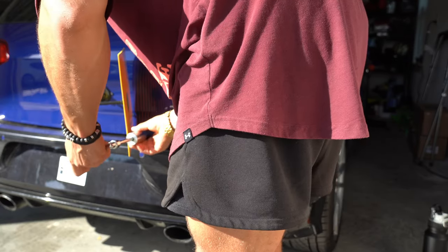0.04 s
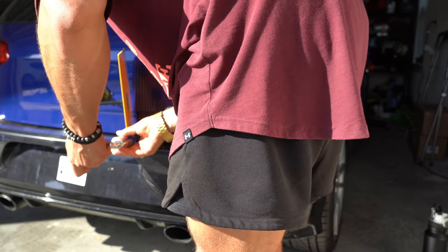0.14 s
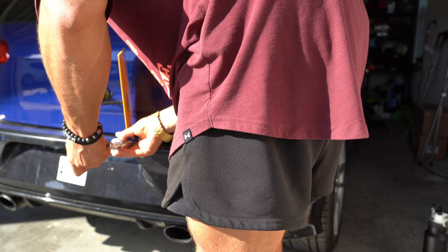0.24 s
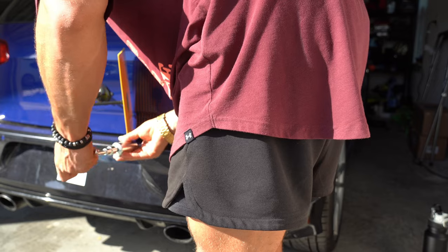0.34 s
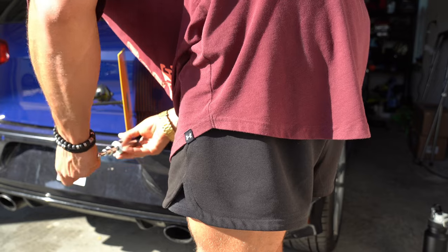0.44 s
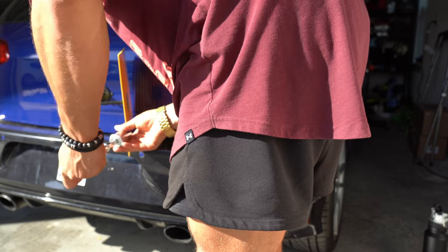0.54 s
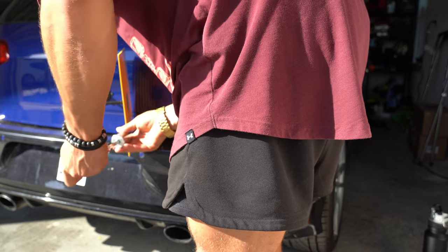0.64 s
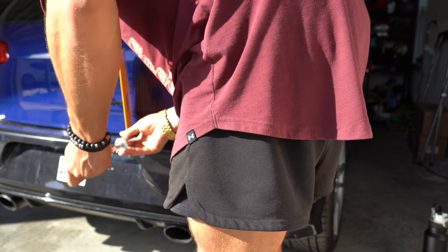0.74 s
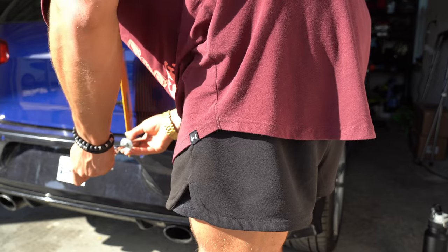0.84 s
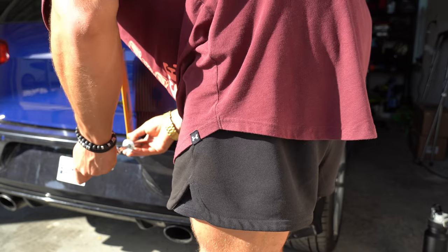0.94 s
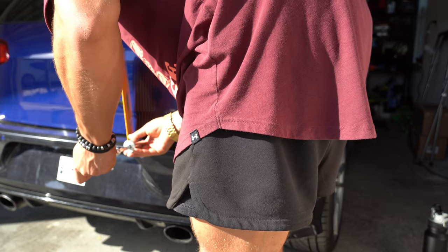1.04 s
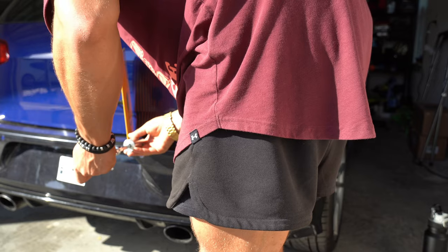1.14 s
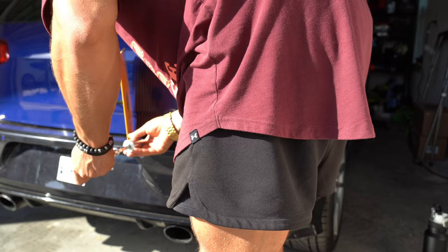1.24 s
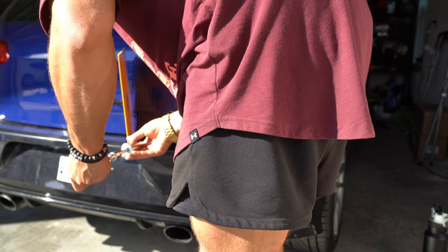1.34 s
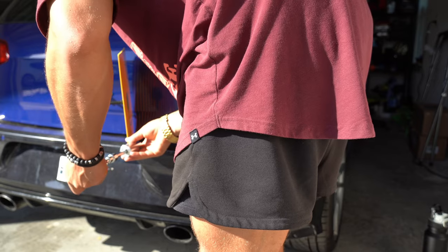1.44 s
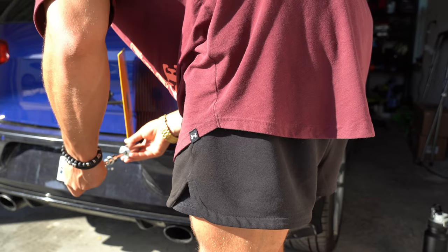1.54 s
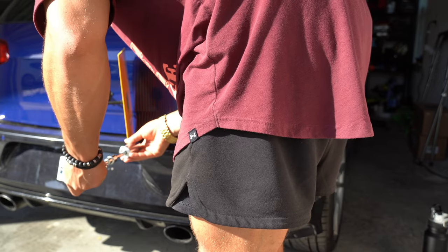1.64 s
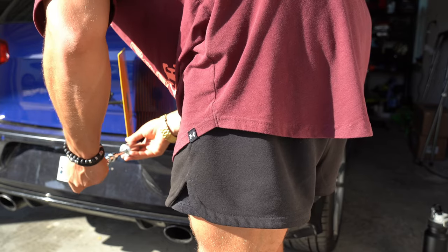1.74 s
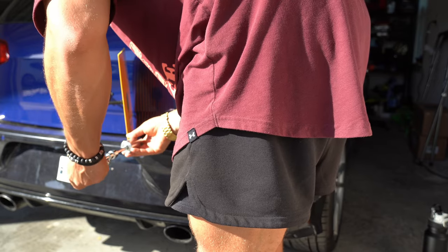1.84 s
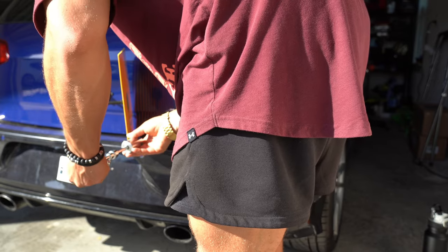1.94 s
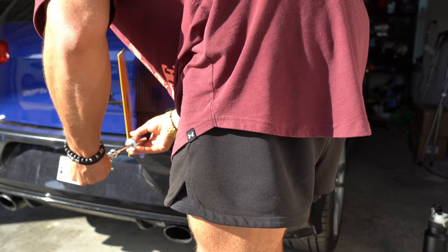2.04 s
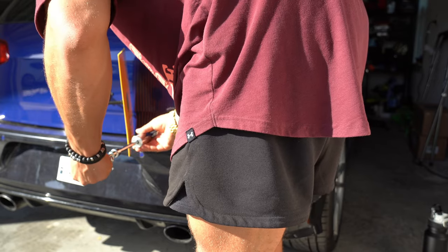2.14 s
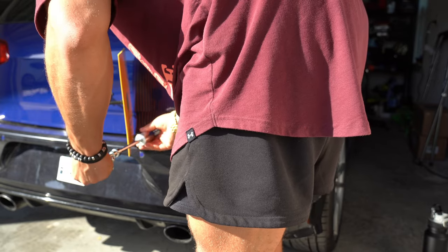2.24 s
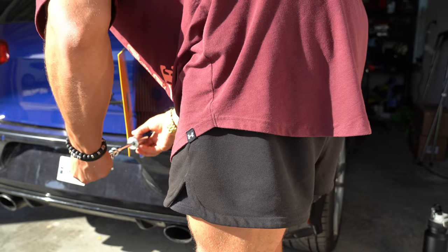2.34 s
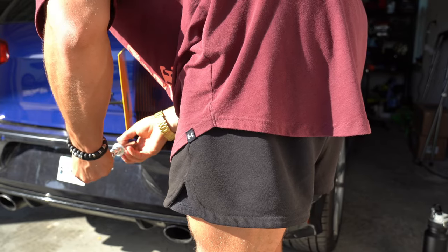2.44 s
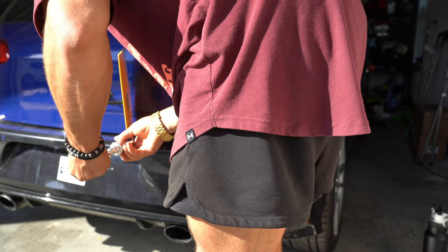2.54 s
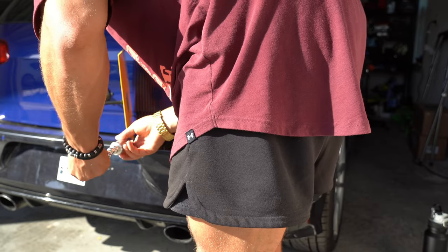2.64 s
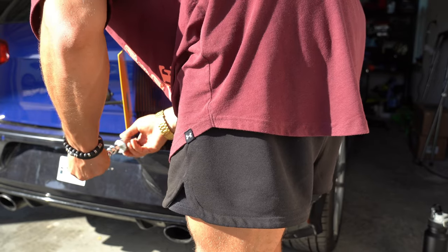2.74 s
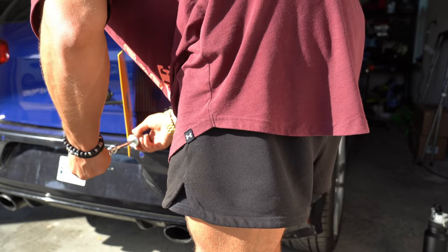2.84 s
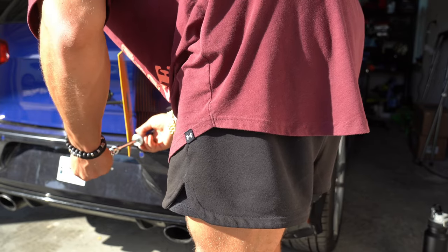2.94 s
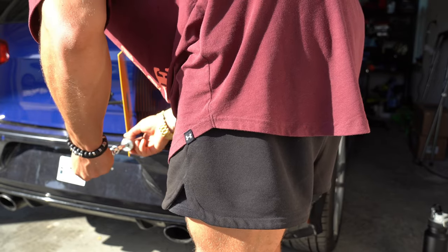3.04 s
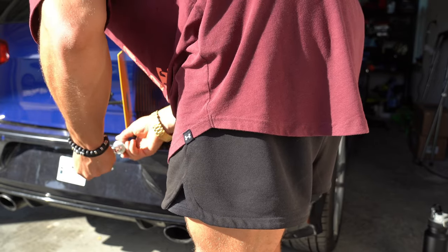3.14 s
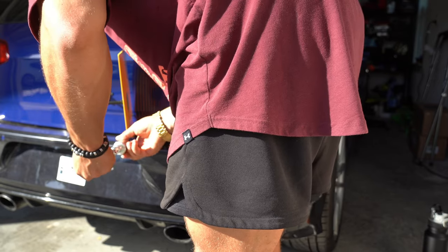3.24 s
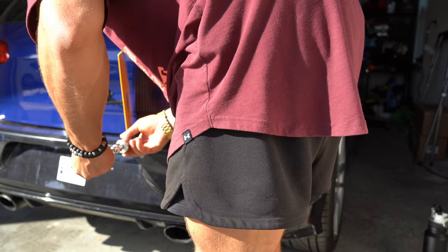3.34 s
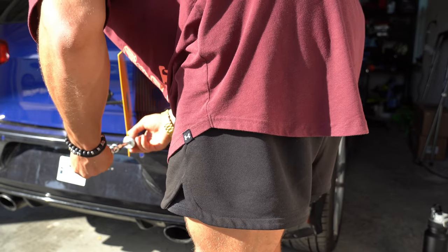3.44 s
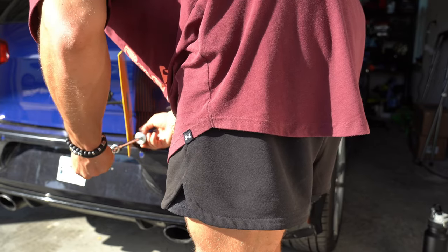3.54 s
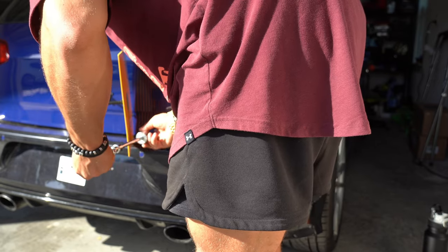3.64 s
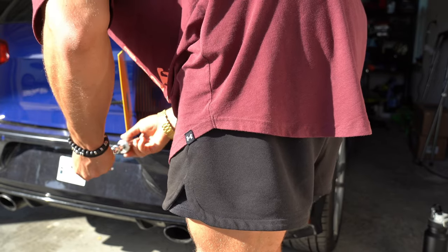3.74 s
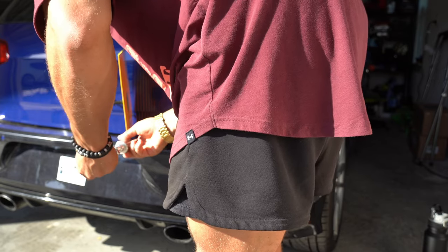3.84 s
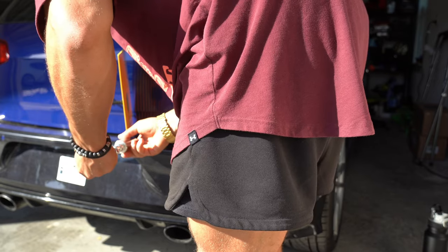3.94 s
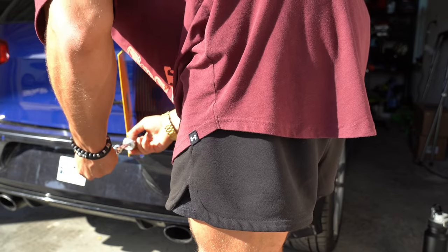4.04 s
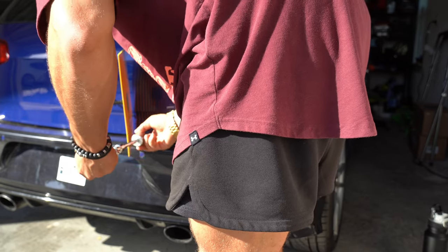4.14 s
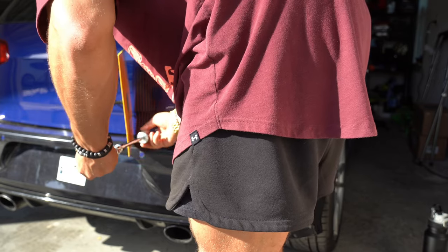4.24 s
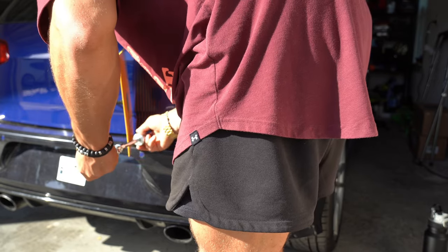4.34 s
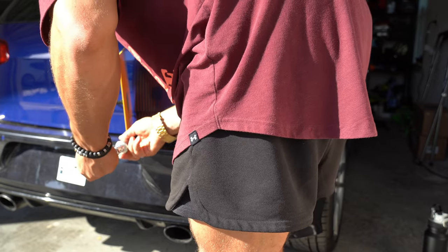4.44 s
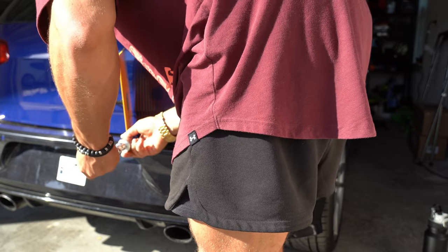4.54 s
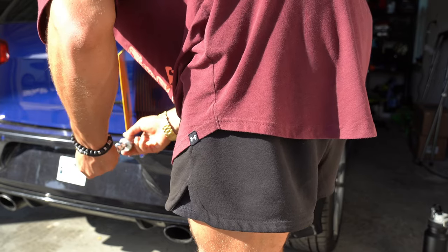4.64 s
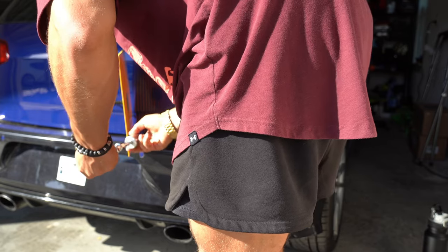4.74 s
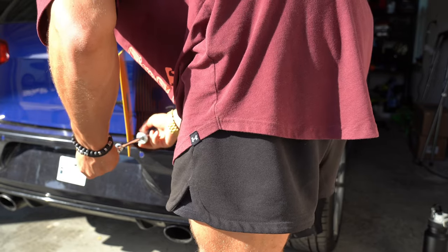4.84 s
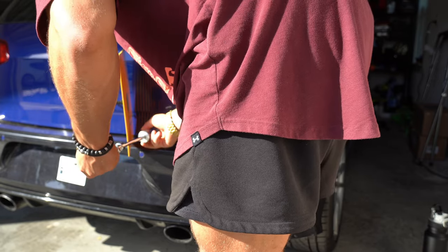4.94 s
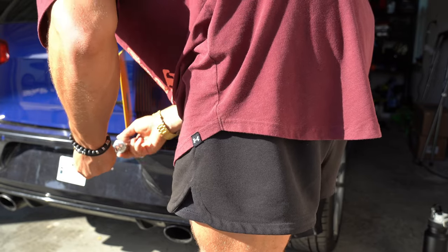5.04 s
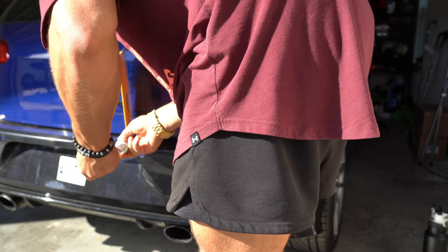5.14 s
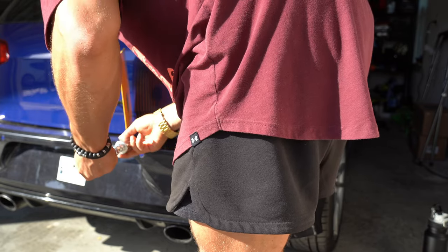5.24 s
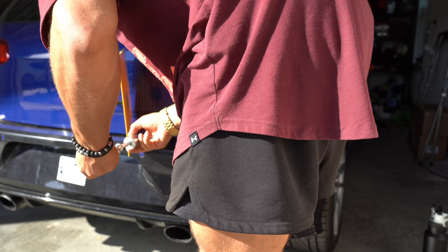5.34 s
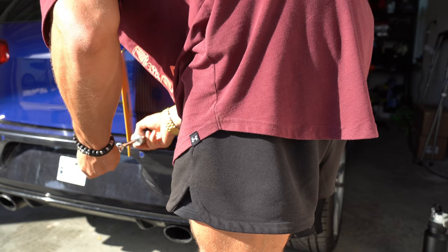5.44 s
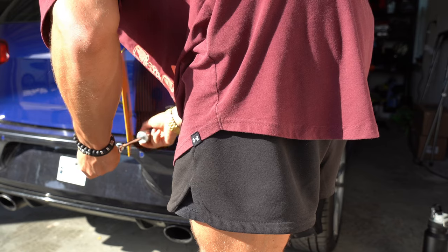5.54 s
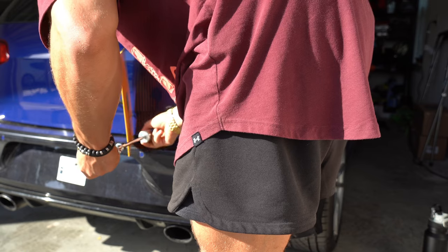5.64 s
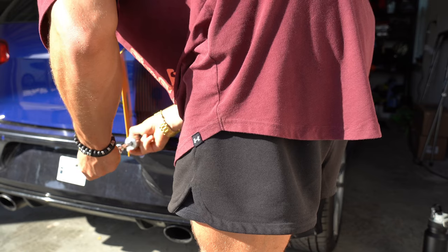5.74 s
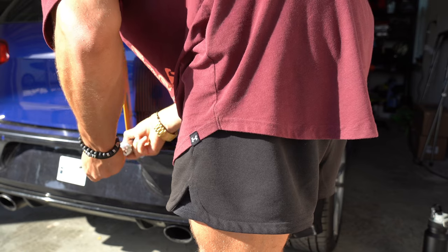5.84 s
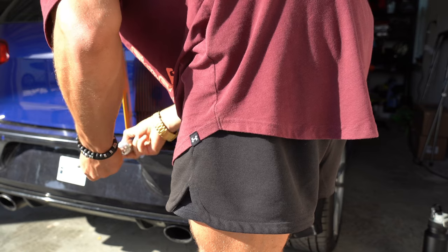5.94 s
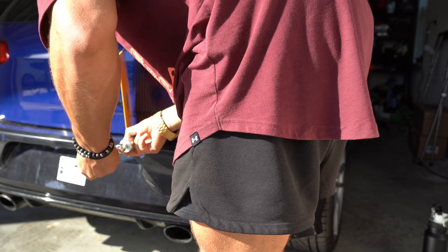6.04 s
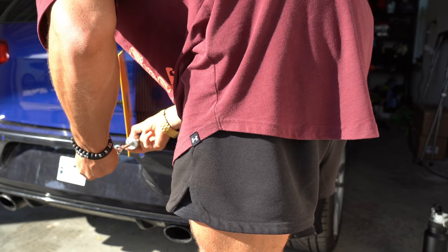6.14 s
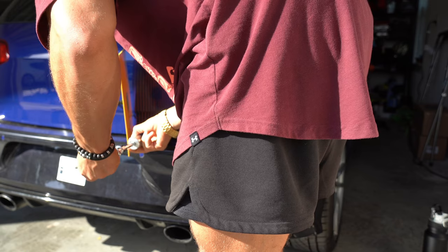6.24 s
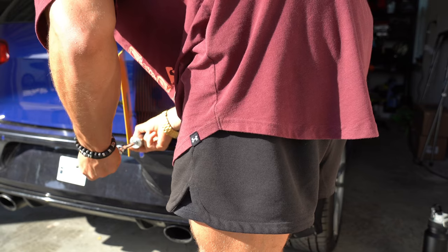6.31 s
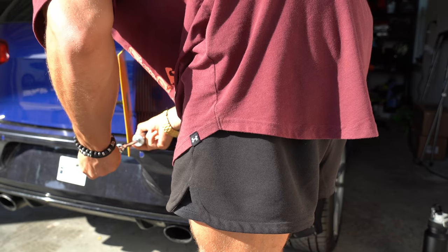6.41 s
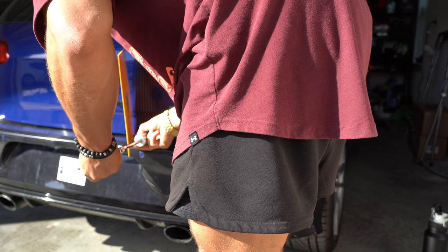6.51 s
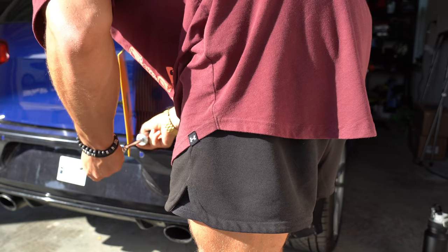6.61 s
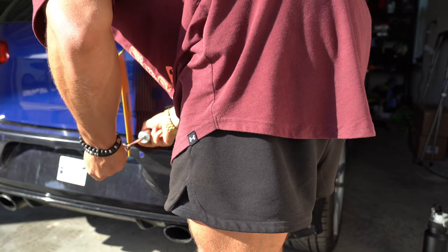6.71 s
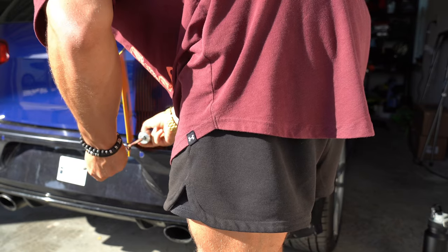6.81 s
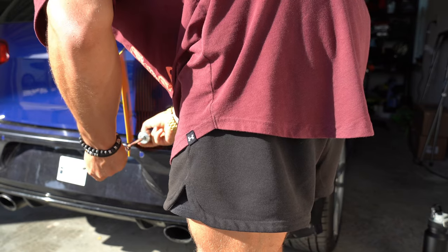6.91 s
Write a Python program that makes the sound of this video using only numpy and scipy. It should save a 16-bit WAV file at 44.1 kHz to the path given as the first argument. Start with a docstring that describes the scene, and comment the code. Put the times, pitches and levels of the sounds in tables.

```python
"""At the mouth of a garage, a hand slide hammer pulls a dent out of a car's rear panel.
Seven times a steel weight scrapes up its rod and cracks against the stop. Each blow jerks
a tab glued to the sheet metal, which booms. Between blows the weight slides back and the
loose tool clinks. The garage echoes every knock over a low background rumble."""
import sys
import numpy as np
from scipy import signal
from scipy.fft import rfft, irfft
from scipy.io import wavfile

SR = 44100
rng = np.random.default_rng(int(sys.argv[2]) if len(sys.argv) > 2 else 0)


def transcribe(u):
    """Save the signal u as a 16-bit wav file named by the first command-line argument.

    u: samples, shape (n,) or (channels, n), limited to [-1, 1]; the rate is SR.
    q: integer samples, one column per channel.
    """
    v = np.clip(np.atleast_2d(u).T, -1, 1)
    q = np.round(v * 32767).astype(np.int16)
    wavfile.write(sys.argv[1], SR, q)


N = 307377
TIME = np.arange(N) / SR


def from_db(db):
    """Turn decibels into a number to multiply a sound by."""
    return 10 ** (np.asarray(db) / 20)


def at_hz(table, hz, column=1):
    """Look up a pitch in a table, blending between its rows."""
    table = np.array(table)
    return np.interp(np.log(np.maximum(hz, 1)), np.log(table[:, 0]), table[:, column])


def coloured(noise, spectrum):
    """Give a noise its balance of low and high pitches, at a standard strength of 1."""
    hz = np.fft.rfftfreq(len(noise), 1 / SR)
    out = irfft(rfft(noise) * from_db(at_hz(spectrum, hz)), len(noise))
    return out / np.std(out)


def wander(per_s):
    """A curve that drifts from one random value to the next."""
    return np.interp(TIME * per_s, np.arange(N), rng.standard_normal(N))


def struck(tones, times, db, tilt_db=0, scatter_db=2, detune=0.01):
    """Each hit rings all of an object's tones; the grip shifts their strength and pitch a little."""
    hz, tone_db, fade_s = np.transpose(tones)[:, :, None]   # a fade time is the time to drop 60 dB
    t = TIME[:int(SR * min(fade_s.max(), 0.5))]
    out = np.zeros(N + SR)
    octaves = np.log2(hz / np.median(hz))
    direction = (-1) ** np.arange(len(hz))[:, None]   # neighbouring tones swing opposite ways
    for s, level_db, slope_db in np.broadcast(times, db, tilt_db):
        strength, shift = rng.standard_normal((2, len(hz), 1))
        start_db = level_db + tone_db + slope_db * octaves + scatter_db * strength
        waves = direction * np.sin(2 * np.pi * hz * (1 + detune * shift) * t)
        start = round(s * SR)
        out[start:start + len(t)] += np.sum(from_db(start_db - 60 * t / fade_s) * waves, axis=0)
    return out[:N]


def chatter(spectrum, times, db, fade_s, grain_db):
    """A crowd of tiny, uneven contacts dies away after each knock."""
    grains = rng.standard_normal(N) * from_db(grain_db * rng.standard_normal(N))
    knocks = np.zeros(N)
    knocks[np.round(times * SR).astype(int)] = from_db(db)
    dying = signal.lfilter([1], [1, -from_db(-60 / (fade_s * SR))], knocks + 1e-18)
    return dying * coloured(grains, spectrum)


# the tone of the background noise: (pitch [Hz], level [dB])
RUMBLE_SPECTRUM = [(15, -42.5), (25, -10.5), (48, -13), (80, -3.5), (117, -6), (236, -1), (394, -2.5),
                   (624, -8), (695, -8), (754, -6), (1520, -17), (4030, -26), (4870, -32), (7310, -40),
                   (16000, -59.5)]
def rumble(level_db=-51):
    """A low, steady noise lies under everything."""
    return from_db(level_db) * coloured(rng.standard_normal(N), RUMBLE_SPECTRUM)


# the weight is pushed back down the rod: (time at mid-stroke [s], rubbing level [dB])
RETURN_STROKES = [(2.18, -56.5), (2.83, -53.5), (3.52, -54.5), (4.18, -51.5), (4.84, -53.5), (5.51, -56),
                  (6.14, -60)]
def strokes(pull_s=0.14, pull_db=-47.5, return_s=0.32):
    """How hard the weight rubs: more as it speeds up to a blow, then a soft swell on the way back."""
    pulls = returns = 0
    for s, *_ in BLOWS:
        speed = np.clip(1 - (s - TIME) / pull_s, 0, 1) * (TIME < s)
        pulls += from_db(pull_db) * speed ** 1.2
    for s, db in RETURN_STROKES:
        progress = np.clip((TIME - s) / return_s, -0.5, 0.5)
        returns += from_db(db) * np.cos(np.pi * progress) ** 2
    return pulls + returns


# tones that rubbing wakes in the rod: (pitch [Hz], width [Hz], level [dB])
RASP_TONES = [(871, 80, 7), (1490, 190, 4), (2348, 220, 2.5), (2780, 400, 0.5), (3640, 240, 2),
              (4400, 250, -4.5), (5260, 310, -4.5), (6370, 450, -11), (7150, 320, -10.5), (9750, 1500, -21)]
def slides(grain_db=3, catch_db=3.5, flutter_db=4.5, dull_hz=7800, body_db=-3.5):
    """Steel rubs on steel: the weight catches and slips, waking now one tone of the rod, now another."""
    friction = rng.standard_normal(N)
    friction *= from_db(grain_db * rng.standard_normal(N) + catch_db * wander(per_s=79))
    rasp = 0
    for k, (hz, width_hz, db) in enumerate(RASP_TONES):
        b, a = signal.iirpeak(hz, hz / width_hz, fs=SR)
        push = friction * from_db(db + flutter_db * wander(per_s=25))
        rasp += (-1) ** k * signal.lfilter(b, a, push)
    rasp = signal.sosfilt(signal.butter(2, dull_hz, fs=SR, output="sos"), rasp)
    body = from_db(body_db) * coloured(friction, BODY_SPECTRUM)   # carried through the tab into the car
    return strokes() * (rasp / np.std(rasp) + body)


# the weight hits the stop:
# (time [s], panel level [dB], steel level [dB], steel brightness [dB per octave])
BLOWS = [(0.1794, -4.5, -4, 5), (2.4711, -3, -9, -5.5), (3.1474, 0, 0.5, 2.5), (3.7984, 0, 1, -6.5),
         (4.4690, 0, 2.5, 0), (5.1209, -0.5, -0.5, -4.5), (5.8117, -3, 0, -7.5)]
# weight and stop, muffled by the hand: (pitch [Hz], level [dB], fade time [s])
STEEL_TONES = [(2050, -24.5, 0.008), (2450, -12.5, 0.0094), (2770, -14, 0.017), (3100, -10.5, 0.008),
               (3650, -9, 0.011), (3990, -8, .011), (4870, -11.5, 0.007), (5420, -14, 0.009),
               (6640, -16.5, .008), (7360, -24, 0.009), (11280, -29.5, 0.0042), (12900, -32.5, 0.005)]
# the rod ringing freely: (pitch [Hz], level [dB], fade time [s])
ROD_TONES = [(3600, -13.5, .1), (5700, -21.5, 0.11), (7300, -18, 0.16), (7530, -16, .06), (9760, -24, 0.08),
             (12150, -26.5, .05), (14500, -30, .04)]
# metal parts buzzing after a blow: (pitch [Hz], level [dB])
BUZZ_SPECTRUM = [(700, -4.5), (1300, 4), (1800, 3.5), (3800, 5), (4500, -1), (6800, 1), (8500, -8.5),
                 (12000, -14.5), (16000, -23.5)]
def cracks():
    """Steel hits steel: a burst of tiny contacts, a ring the hand chokes at once, a faint rod ping."""
    times, _, steel_db, tilt_db = np.transpose(BLOWS)
    ring = struck(STEEL_TONES, times, steel_db + 0.6, tilt_db, scatter_db=3.15, detune=0.0029)
    ping = struck(ROD_TONES, times, steel_db - 26, scatter_db=1.5, detune=0.0018)
    burst = chatter(BUZZ_SPECTRUM, times, steel_db - 10, fade_s=0.014, grain_db=0.5)
    return ring + ping + burst


# the sheet metal and the car body behind it: (pitch [Hz], level [dB], fade time [s])
PANEL_TONES = [(64.6, -47.5, 0.41), (80, -45, 0.21), (118, -52.5, 0.49), (155, -45, 0.86),
               (182.3, -39, 0.6), (211.1, -32, 0.37), (248.9, -17, 0.27), (260.5, -16, 0.14),
               (313.5, -9, 0.12), (383, -28, 0.38), (394.4, -22.5, 0.19), (429, -13, 0.091),
               (454, -22.5, 0.072), (518, -15, 0.21), (575, -24, 0.16), (560.2, -20.5, 0.26),
               (635, -26, 0.33), (682.7, -14.5, 0.12), (700.7, -13.5, 0.12), (802, -27, 0.17),
               (896.7, -23, 0.15), (993, -30, 0.046), (1148, -35.5, 0.17), (1148, -24, 0.26),
               (1287, -35, 0.1), (1350, -31.5, 0.089), (1486, -25.5, 0.072)]
# the car body's many small tones, blurred into noise: (pitch [Hz], level [dB])
BODY_SPECTRUM = [(40, -31.5), (150, -20), (240, -5.5), (370, -1), (480, -2.5), (720, -7), (950, -11),
                 (1500, -18.5), (2500, -24.5), (8000, -60.5)]
def booms(tab_lag_s=0.00057, heave_hz=330, heave_db=-8, heave_fade_s=0.0077, heave_cut_hz=190):
    """The springy tab tugs the panel: the sheet heaves out once, then rings while loose parts buzz."""
    times, panel_db, _, _ = np.transpose(BLOWS)
    pulled = times + tab_lag_s
    heave = struck([(heave_hz, heave_db, heave_fade_s)], pulled, panel_db)
    # the heave carries no deep bass
    heave = signal.sosfilt(signal.butter(2, heave_cut_hz, "high", fs=SR, output="sos"), heave)
    ring = struck(PANEL_TONES, pulled, panel_db - 0.4, scatter_db=2, detune=0.007)
    shudder = chatter(BODY_SPECTRUM, pulled, panel_db - 14.5, fade_s=0.27, grain_db=2.5)
    buzz = chatter(BUZZ_SPECTRUM, times, panel_db - 18, fade_s=0.1, grain_db=4.5)
    return heave + ring + shudder + buzz


# light touches of weight, rod and tab: (time [s], clink level [dB], panel level [dB])
TAPS = [(0.6199, -40.5, -47), (0.879, -56.5, -56), (1.1652, -55.5, -58), (1.2033, -54, -43),
        (1.8601, -44.5, -40), (1.9003, -38, -29.5), (2.02, -72, -37), (2.143, -50.5, -49),
        (2.2455, -53, -38), (3.7567, -33.5, -48), (4.4269, -38.5, -32.5), (5.0309, -41.5, -33.5),
        (5.7714, -41, -35.5), (6.7378, -50, -41)]
# the tone of a light touch on the rod: (pitch [Hz], level [dB])
CLINK_SPECTRUM = [(800, -22), (2000, -0.5), (3600, 9), (5800, 0), (7500, -7), (9000, -12.5), (16000, -32.5)]
def taps():
    """Light touches leave the rod free to ring and barely stir the panel."""
    times, clink_db, panel_db = np.transpose(TAPS)
    clink = chatter(CLINK_SPECTRUM, times, clink_db, fade_s=0.041, grain_db=3.5)
    ring = struck(ROD_TONES, times, clink_db - 0.5, scatter_db=4, detune=0.0067)
    clunk = struck(PANEL_TONES, times, panel_db - 1, scatter_db=4.5, detune=0.0052)
    shudder = chatter(BODY_SPECTRUM, times, panel_db - 12, fade_s=0.11, grain_db=4.5)
    return clink + ring + clunk + shudder


# the garage's echo: (pitch [Hz], level against the direct sound [dB], fade time [s])
GARAGE_ECHO = [(70.5, 2, 1), (312.7, -15.5, 0.53), (700, -11.5, 0.72), (1500, -9, 0.67), (3440, -5, 0.61),
               (7000, -3.5, 0.56), (11000, -1.5, 0.41), (16000, -2.5, .28)]
def garage(sound, first_echo_s=0.0024, build_s=0.002):
    """The nearest surfaces answer first; the echoes pile up, then each pitch fades at its own pace."""
    t = TIME[:SR]
    hz = np.fft.rfftfreq(SR, 1 / SR)
    noise_spectrum = rfft(rng.standard_normal(SR))
    edges_hz = np.geomspace(40, 18000, 19)
    build_up = 1 - np.exp(-np.maximum(t - first_echo_s, 0) / build_s)
    echo = 0
    for low, high in zip(edges_hz, edges_hz[1:]):
        centre = np.sqrt(low * high)
        band = irfft(noise_spectrum * (hz >= low) * (hz < high), SR)
        tail = band * build_up * from_db(-60 * t / at_hz(GARAGE_ECHO, centre, column=2))
        tail *= np.sqrt(2 * (high - low) / SR / np.sum(tail ** 2))   # as strong as the direct sound
        echo += tail * from_db(at_hz(GARAGE_ECHO, centre))
    return signal.fftconvolve(sound, echo)[:N]


def scene(crack_echo_db=-8, sway_rad_per_s=2.026):
    """Tool, panel, echoes and rumble together; the hand shields the garage from part of the crack."""
    crack = cracks()
    tool_and_panel = booms() + taps() + slides()
    into_room = tool_and_panel + from_db(crack_echo_db) * crack
    # the worker sways in front of the panel, so each knock finds other paths through the room
    sway = sway_rad_per_s * TIME
    echoes = garage(into_room * np.cos(sway)) + garage(into_room * np.sin(sway))
    return (crack + tool_and_panel + echoes + rumble())[None]


def record(dry, low_cut_hz=42, ceiling=1.05, high_cut_hz=16000):
    """The microphone loses the deepest bass, the loudest peaks are rounded and the top treble is cut."""
    thinned = signal.sosfilt(signal.butter(2, low_cut_hz, "high", fs=SR, output="sos"), dry)
    rounded = ceiling * np.tanh(thinned / ceiling)
    return signal.sosfilt(signal.ellip(10, 0.1, 80, high_cut_hz, fs=SR, output="sos"), rounded)


dry = scene()
out = record(dry)
transcribe(out)
```